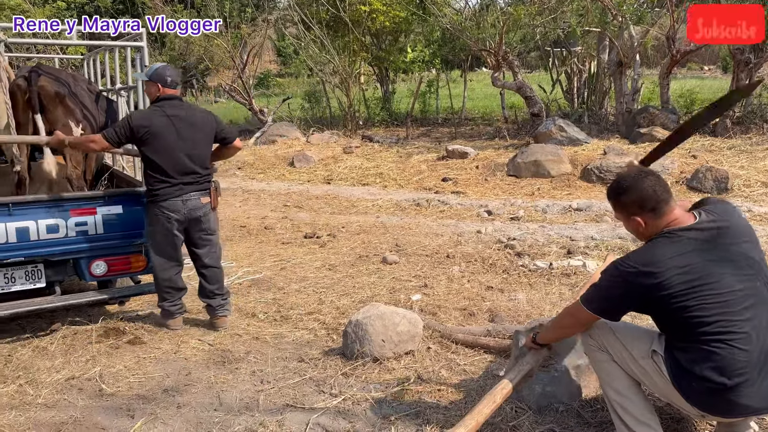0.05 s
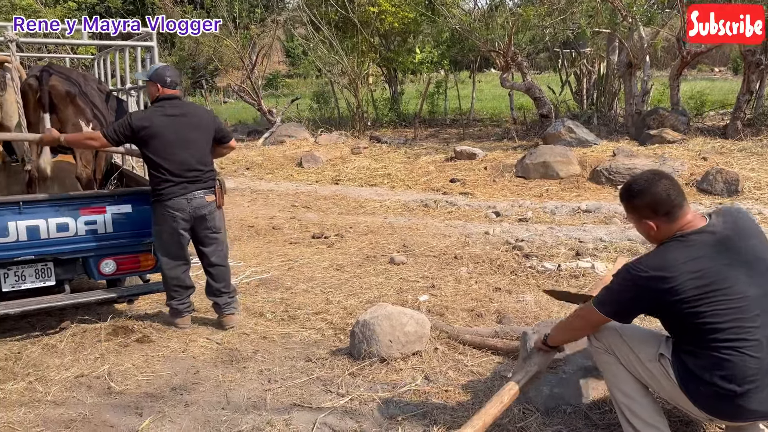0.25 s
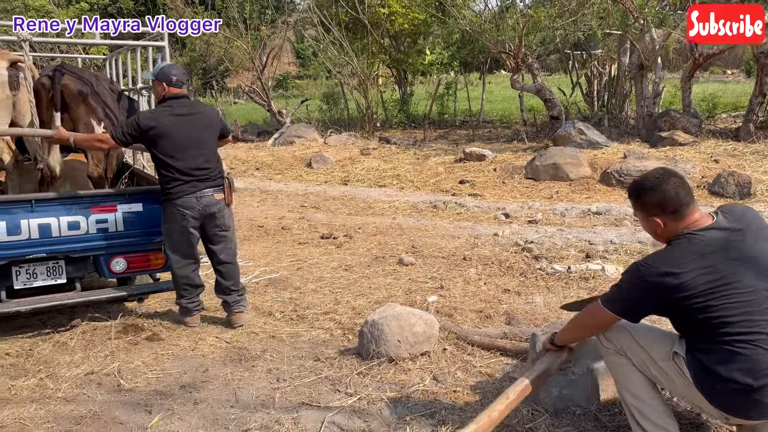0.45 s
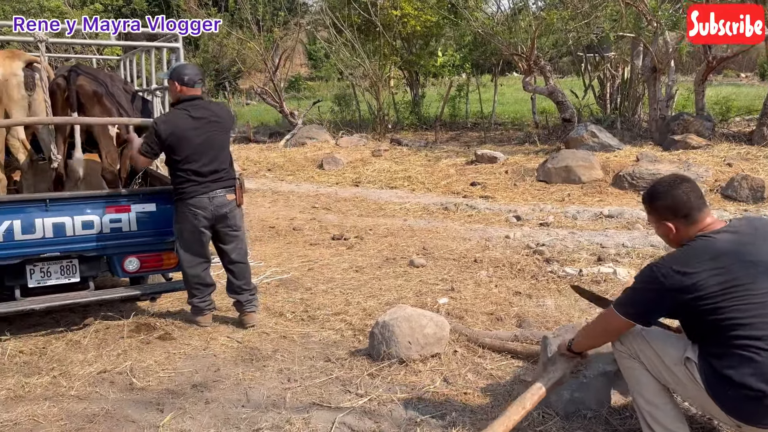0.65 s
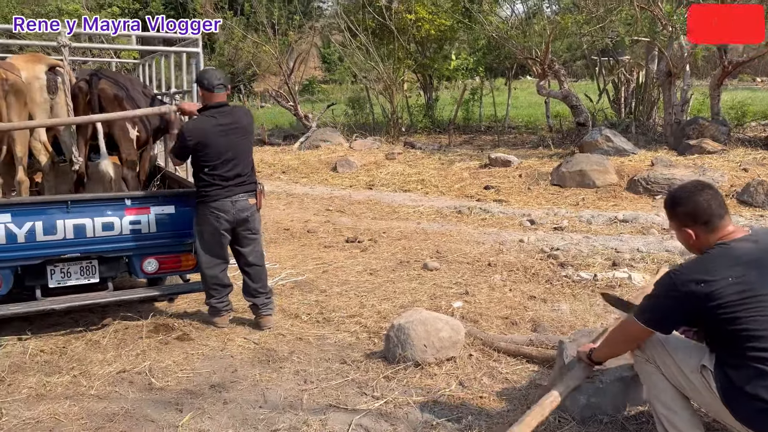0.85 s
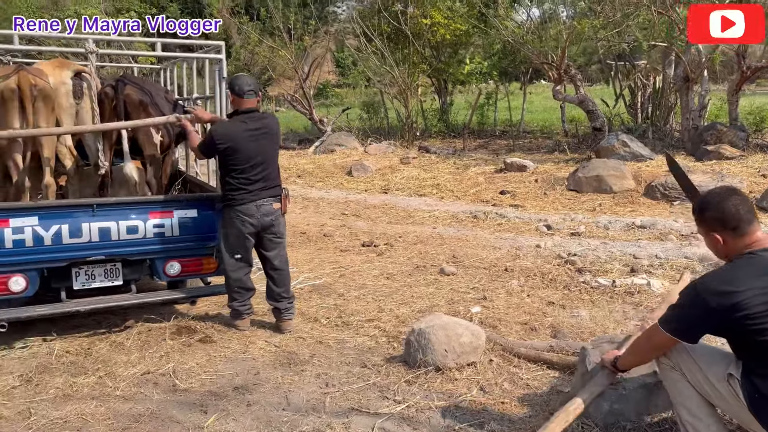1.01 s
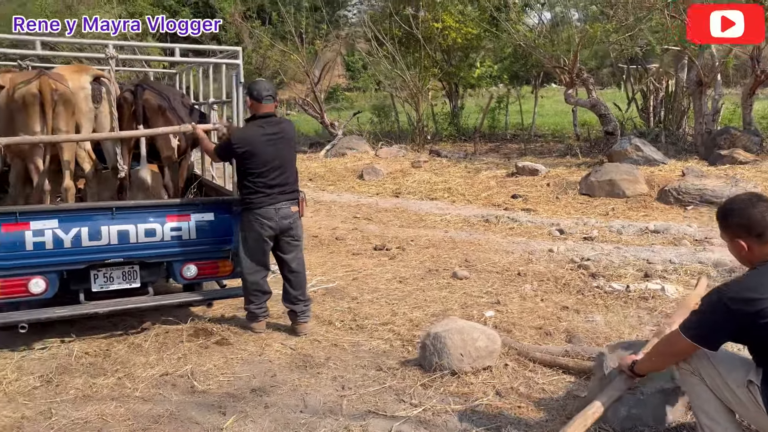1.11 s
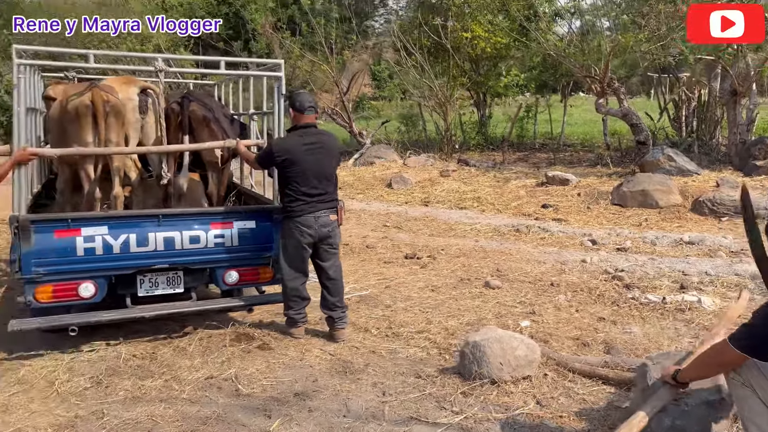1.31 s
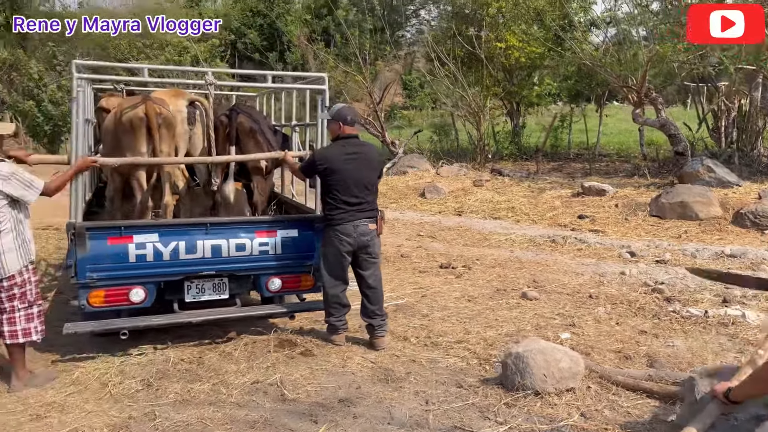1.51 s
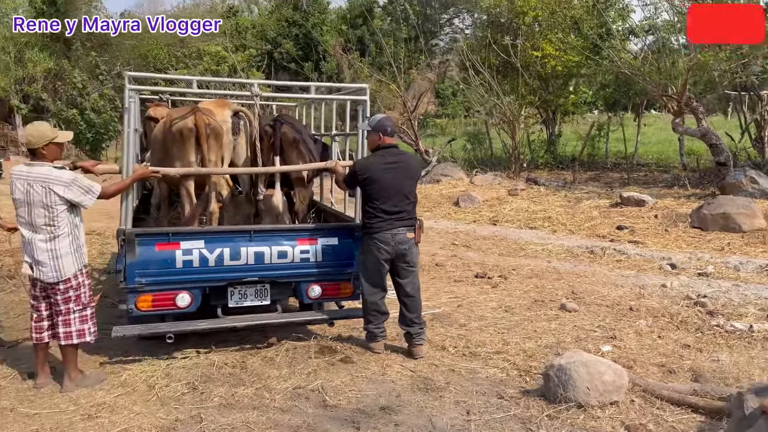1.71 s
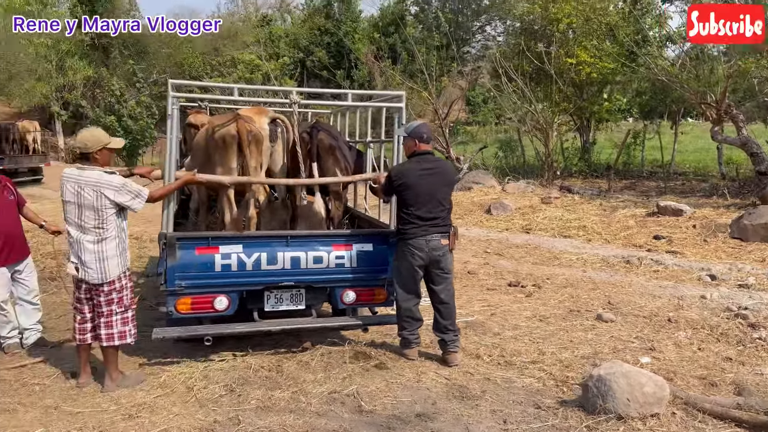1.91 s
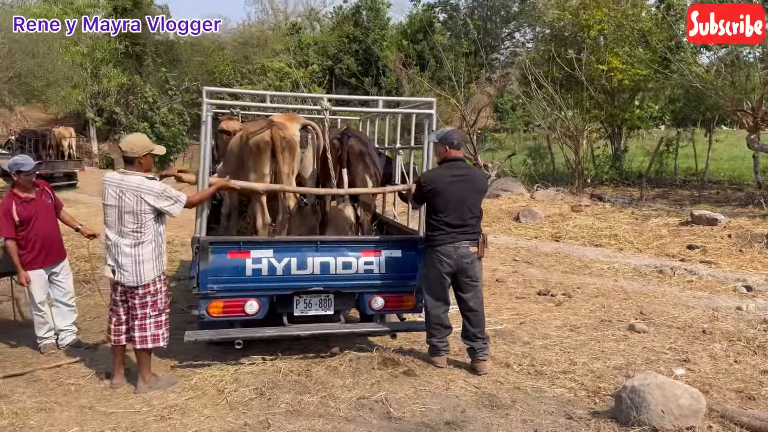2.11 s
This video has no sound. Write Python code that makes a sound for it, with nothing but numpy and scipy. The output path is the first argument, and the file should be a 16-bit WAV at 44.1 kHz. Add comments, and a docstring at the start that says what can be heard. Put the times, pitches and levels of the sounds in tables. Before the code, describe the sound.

Close, dry machete chops into a wooden pole resting on stones, three in all, with splintering crack and short woody ring; steel sings high after the last two. Outdoors in stereo, soft truck bed rumble and hooves behind.

```python
"""Blade steel still sings from an earlier stroke; then a machete chops three times into a wooden pole on stones.
The chops are close, a little right: pushed, knocked and ringing wood as chirps and sines, splinters, thud
and farmyard echo as shaped noise. After the second and third, the blade sings as pitch-bent, fluttering sines.
Behind: cattle hooves boom on a rumbling truck bed, small clinks crackle, a bird chirps once, air hisses."""
import sys
import numpy as np
from scipy import signal
from scipy.fft import rfft, irfft, next_fast_len
from scipy.io import wavfile
from scipy.ndimage import uniform_filter1d, map_coordinates

SR = 44100
rng = np.random.default_rng(int(sys.argv[2]) if len(sys.argv) > 2 else 0)


def unload_wav(signal):
    """Save mono or channel-first audio to the path in sys.argv[1] as 16-bit WAV at rate SR, clipped to [-1, 1]."""
    wavfile.write(
        sys.argv[1],
        SR,
        np.round(np.clip(np.atleast_2d(signal).T, -1, 1) * 32767).astype(np.int16),
    )


N = 94815

# truck bed rumble: spectrum (frequency [Hz], level [dB]); course (time [s], level [dB])
RUMBLE_SPECTRUM = [(20, -34.5), (45, -6.5), (90, 1.5), (160, -2), (300, -7.5), (550, -19.5), (1000, -24),
                   (3000, -51)]
RUMBLE_COURSE = [(0, -69), (.07, -60.5), (0.141, -77), (0.212, -48.5), (.35, -54.5), (.5, -52.5),
                 (.65, -52.5), (.85, -56), (.92, -62.5), (1.0, -57.5), (1.132, -61), (1.2, -45),
                 (1.36, -53), (1.58, -56.5), (1.65, -47.5), (1.8, -56.5), (2.15, -58.5)]
# hooves on the truck bed (time [s], level [dB], resonance [Hz], resonance re bed noise [dB], t60 [s])
HOOVES = [(.365, -58.5, 229.2, -8, 0.52), (0.612, -57.5, 296, 1.5, .45), (0.794, -61, 270.3, 13, 0.13),
          (1.17, -51, 169, -2, .55), (1.61, -65.5, 166, 4.5, 0.36), (2.033, -34.5, 418.7, 0, 0.5)]
# bed noise under a hoof (frequency [Hz], level [dB])
BED_SPECTRUM = [(60, -27.5), (150, -6.5), (300, 0.5), (500, 3), (850, -0.5), (1100, -20), (2000, -21.5),
                (3500, -37), (9000, -56)]
HOOF_RISE_S = 0.003
# knocks, clinks, crackles of gear and dry straw (time [s], level [dB], centre [Hz], width [octaves], t60 [s])
CLICKS = [(.209, -43.5, 6670, 1.1, 0.017), (0.558, -57, 3710, 0.49, 0.26), (.563, -65, 3590, 0.012, 0.57),
          (0.562, -56, 7700, 1.1, 0.16), (.846, -47.5, 900, 0.28, 0.095), (.846, -60, 1100, 0.73, 0.08),
          (0.846, -66.5, 6070, 0.69, 0.17), (0.924, -70, 7040, 0.02, 0.35), (1.166, -64.5, 3570, 0.14, 0.1),
          (1.198, -39, 1960, 0.42, 0.0055), (1.212, -69, 12000, 0.72, 0.036),
          (1.258, -57.5, 3000, 0.73, 0.0066), (2.014, -42, 12000, 1.2, 0.016)]
# steady air noise (frequency [Hz], level [dB])
AIR_SPECTRUM = [(100, -22.5), (900, -3.5), (2000, -4), (7000, -10.5), (10500, -24), (15000, -53)]
AIR_DB = -75

# diffuse sound (frequency [Hz], left-right correlation [-1..1])
CORRELATION = [(100, 0.97), (300, 0.95), (700, 0.47), (1400, 1), (3100, 0.75), (15000, 0.17)]
# left port hears later by
WOOD_LAG_S, BLADE_LAG_S = 0.000088, 0.00019

# blade upper modes (frequency [Hz])
BLADE_HZ = [4110, 4455, 4845, 5280, 5700, 6115, 6545, 7420, 7860]
# the same modes in order (level re upper modes [dB], t60 [s])
BLADE_MODES = [(-5.5, 1.1), (1.5, 0.68), (-15.5, 1.4), (-4, 1.1), (-6.5, 1.3), (-1.5, 1.6), (1, 0.78),
               (0, 0.54), (-17.5, .25)]
BLADE_LOWEST_HZ = 3830
# one list per free swing (time [s], pitch bend [%], lowest mode [dB], upper modes before decay [dB])
SWINGS = [
    [(1.381, -3, -73, -56.5), (1.42, 0.2, -49, -46.5), (1.448, 0, -63, -54), (1.5, 1.5, -47, -51),
     (1.545, 1.2, -43.5, -55.5), (1.615, 2, -59, -51.5), (1.65, -0.4, -57.5, -54.5), (1.79, -1.5, -54, -74),
     (1.85, -3, -58, -85)],
    [(1.851, 0.22, -47.5, -38), (1.89, -0.56, -45.5, -43), (1.945, 0.16, -51.5, -45), (2.0, 0.57, -44, -53),
     (2.03, .8, -45, -53.5), (2.09, -0.17, -64.5, -58), (2.15, -0.71, -66, -58)],
]
# ring left from an earlier stroke (time [s], pitch bend [%], lowest mode [dB], upper modes before decay [dB])
OLD_RING = [(0, -.7, -51, -63), (.07, -1, -94, -55), (.11, -1, -59, -70), (.17, -1, -81.5, -63),
            (.23, -1.6, -66.5, -87)]
OLD_RING_AGE_S = 0.21
MAX_BEND_PERCENT = 2.1  # the largest pitch bend either way
FLUTTER_DB, FLUTTER_KNOTS_PER_S = 3.5, 22
# reflection off the ground; the delay grows as the blade moves
GROUND_GAIN, GROUND_DELAY_S, GROUND_DRIFT_S_PER_S = 0.3, 0.005, 0.006

# chops (time [s], knock [dB], knock [Hz], bite [Hz], bite [dB], bite t60 [s],
#        splinter [dB], crumble [dB], scatter [dB], left minus right [dB])
CHOPS = [(0.2285, 3.5, 742, 2453, -11, 0.019, -20.5, -33.5, -18.5, -1.3),
         (1.3786, 2, 832, 3173, -7.5, 0.01, -25.5, -33.5, -18, -3.5),
         (1.849, 2, 1281, 1845, -12, 0.033, -10.5, -28, -21, -6.5)]
# pole modes (frequency [Hz])
POLE_HZ = [241, 381, 479, 558, 648, 722, 745, 856, 954, 1016, 1151, 1283, 1843, 2123]
# the same modes in order; the spot struck sets the levels
# (t60 before damping cap [s], first chop [dB], second chop [dB], third chop [dB])
POLE_MODES = [(0.17, -26.5, -17, -24.5), (0.15, -41, -21, -19.5), (0.11, -22.5, -23, -23.5),
              (0.2, -27, -17.5, -21.5), (.11, -39, -17.5, -15.5), (0.13, -17, -56, -53),
              (0.17, -28, -11.5, -22), (.115, -28.5, -14, -19), (0.28, -23.5, -40.5, -44),
              (0.27, -14, -38.5, -37.5), (0.15, -23, -14.5, -21.5), (.09, -34, -18.5, -17.5),
              (0.2, -34, -31, -32), (0.21, -33, -45.5, -61.5)]
POLE_RISE_S = 0.0027
POLE_T60_CAP_700HZ_S = 0.145  # hand and stones damp the pole, high modes more
KNOCK_RISE_S, KNOCK_T60_S = 0.003, 0.022
# first push of the edge (frequency [Hz], gain [dB])
PUSH_SPECTRUM = [(60, -34.5), (200, -37.5), (450, -14), (900, 13), (1500, 11), (2300, -5.5), (4000, -36.5),
                 (9000, -28.5)]
PUSH_RE_KNOCK_DB = 9.5
BENDING_TRAVEL_1KHZ_S = 0.001327
# splitting fibres (frequency [Hz], level [dB])
SPLINTER_SPECTRUM = [(500, -15.5), (2500, -11.5), (3500, -7), (4600, -1.5), (6200, -5.5), (8200, -1),
                     (9500, -6.5), (11000, -30.5), (13000, -1.5), (16000, -10)]
SPLINTER_DELAY_S, SPLINTER_T60_S, CRUMBLE_T60_S = 0.0019, 0.012, 0.17
# scatter off ground and stones (frequency [Hz], level [dB])
SCATTER_SPECTRUM = [(50, -29), (120, -19.5), (200, -5), (400, -4), (800, 0.5), (1200, -11.5), (1600, -16),
                    (2500, -20), (3500, -29), (9000, -64.5)]
SCATTER_RISE_S, SCATTER_T60_S = 0.004, 0.16
REFLECTION_DB, REFLECTION_DELAY_S = -20.5, 0.017  # off a nearby surface
# thud of the ground under the pole (frequency [Hz], level [dB])
THUD_SPECTRUM = [(20, -34), (50, -24.5), (85, 0), (140, -10), (250, -19.5), (600, -65.5)]
THUD_DB, THUD_DELAY_S, THUD_T60_S = -33.5, 0.014, 0.27
# far yard echo (frequency [Hz], level [dB])
YARD_SPECTRUM = [(60, -6.5), (140, -33.5), (400, -6.5), (1000, -0.5), (2500, -8.5), (7000, -7.5),
                 (10000, -18.5), (15000, -33.5)]
YARD_DB, YARD_RISE_S, YARD_T60_S = -55, 0.0094, 0.88
PAN_FROM_HZ = 420  # lower sound reaches both ports equally
TOP_HZ = 16500


def amp(db):
    """Decibels to gain."""
    return 10 ** (np.asarray(db) / 20)


def unit(x):
    """Scaled to rms 1."""
    return x / np.sqrt(np.mean(x ** 2) + 1e-20)


def along(points, hz):
    """Interpolate (Hz, value) points on a log-frequency axis."""
    point_hz, values = np.transpose(points)
    return np.interp(np.log(hz + 1), np.log(point_hz + 1), values)


def since(start_s):
    """Seconds after start_s, zero before."""
    return np.maximum(np.arange(N) / SR - start_s, 0)


def decay(t, t60_s):
    """Exponential decay, 60 dB in t60_s."""
    return np.exp(-np.log(1000) * t / t60_s)


def fade(start_s, rise_s, t60_s):
    """Quick exponential rise, then exponential decay."""
    t = since(start_s)
    return (1 - np.exp(-t / rise_s)) * decay(t, t60_s)


def tone(start_s, hz):
    """A sine that starts at start_s in zero phase."""
    return np.sin(2 * np.pi * hz * since(start_s))


def wobble(knots_per_s):
    """A smooth random curve through knots of unit variance."""
    knots = rng.standard_normal(size=200)
    return map_coordinates(knots, [np.arange(N) * knots_per_s / SR], mode="wrap")


def filtered(x, response):
    """x times a complex response of frequency, zero-padded."""
    m = next_fast_len(N + SR // 2)
    return irfft(rfft(x, m) * response(np.fft.rfftfreq(m, 1 / SR)), m)[..., :N]


def noise(colour_db):
    """Diffuse stereo noise of rms 1; mid and side shares set the correlation at each frequency."""
    def mid_side_gain(f):
        angle = np.arccos(np.clip(along(CORRELATION, f), -1, 1)) / 2
        return amp(colour_db(f)) * [np.cos(angle), np.sin(angle)]

    mid, side = filtered(rng.standard_normal((2, N)), mid_side_gain)
    return unit(np.array([mid + side, mid - side]))


def rush(spectrum):
    """Diffuse noise of rms 1 with an (Hz, dB) spectrum."""
    return noise(lambda f: along(spectrum, f))


def placed(x, lag_s):
    """A mono sound at the two ports, the left one later."""
    return filtered(x, lambda f: np.exp(-1j * np.pi * f * lag_s * np.array([[1], [-1]])))


def air():
    """Steady broadband hiss."""
    return amp(AIR_DB) * rush(AIR_SPECTRUM)


def cattle():
    """Hooves excite bed noise and one resonance each, over the bed's low rumble."""
    time_s, level_db = np.transpose(RUMBLE_COURSE)
    out = rush(RUMBLE_SPECTRUM) * amp(np.interp(np.arange(N) / SR, time_s, level_db))
    for start_s, db, hz, share_db, t60_s in HOOVES:
        boom = rush(BED_SPECTRUM) + amp(share_db) * tone(start_s, hz)
        out = out + amp(db) * fade(start_s, HOOF_RISE_S, t60_s) * boom
    return out


def clicks():
    """Faint clinks and crackles: decaying noise bands, bell-shaped in octaves."""
    out = np.zeros((2, N))
    for start_s, db, hz, width, t60_s in CLICKS:
        band = noise(lambda f: -np.minimum(4 * (np.log2((f + 1) / hz) / width) ** 2, 60))
        out += amp(db) * fade(start_s, t60_s / 50, t60_s) * band
    return out


def bird(start_s=1.275, length_s=0.018, from_hz=6500, to_hz=4900, db=-68):
    """One far chirp: a sine gliding down under a half-sine envelope."""
    u = np.clip(since(start_s) / length_s, 0, 1)
    hz = from_hz + (to_hz - from_hz) * u
    return amp(db) * np.sin(np.pi * u) * np.sin(2 * np.pi * np.cumsum(hz) / SR)


def blade(swing, age_s=0):
    """Steel modes sing; the swing bends pitch, upper modes flutter, the ground reflection beats."""
    time_s, bend_percent, low_db, upper_db = np.transpose(swing)
    now, t = np.arange(N) / SR, since(time_s[0])
    bend = np.clip(np.interp(now, time_s, bend_percent), -MAX_BEND_PERCENT, MAX_BEND_PERCENT)
    bent_time = np.cumsum(1 + bend / 100) / SR

    def sing(hz):
        return np.sin(2 * np.pi * (hz * bent_time + rng.random()))

    upper = np.zeros(N)
    for hz, (db, t60_s) in zip(BLADE_HZ, BLADE_MODES):
        flutter_db = FLUTTER_DB * wobble(FLUTTER_KNOTS_PER_S)
        upper += amp(db + flutter_db) * decay(t + age_s, t60_s) * sing(hz)
    ring = amp(np.interp(now, time_s, low_db)) * sing(BLADE_LOWEST_HZ)
    ring = ring + amp(np.interp(now, time_s, upper_db)) * upper
    gate = np.clip(np.minimum(t, time_s[-1] - now) / 0.0044, 0, 1)  # 4.4 ms ramps
    direct = ring * gate
    ground_delay_s = GROUND_DELAY_S + GROUND_DRIFT_S_PER_S * (t + 0.008 * wobble(11))
    ground = GROUND_GAIN * np.interp(now - ground_delay_s, now, direct)
    return placed(direct, BLADE_LAG_S) + ground


def push(start_s):
    """The edge's push, a falling chirp because low bending waves travel slowly."""
    def response(f):
        phase = 2 * np.pi * (f * start_s + 2 * BENDING_TRAVEL_1KHZ_S * np.sqrt(f * 1000))
        return amp(along(PUSH_SPECTRUM, f)) * np.exp(-1j * phase)

    return filtered(signal.unit_impulse(N), response) * (since(start_s) > 0)


def pole(start_s, chop):
    """Pole modes after one blow: damped sines of alternating sign."""
    out = np.zeros(N)
    for k, (hz, (t60_s, *levels_db)) in enumerate(zip(POLE_HZ, POLE_MODES)):
        damped_t60_s = min(t60_s, POLE_T60_CAP_700HZ_S * (700 / hz) ** 0.5)
        mode = tone(start_s, hz) * fade(start_s, POLE_RISE_S, damped_t60_s)
        out += amp(levels_db[chop]) * (-1) ** k * mode
    return out


def wood(start_s, chop, knock_db, knock_hz, bite_hz, bite_db, bite_t60_s):
    """Pushed and knocked by the edge, bitten, then ringing."""
    knock = tone(start_s, knock_hz) * fade(start_s, KNOCK_RISE_S, KNOCK_T60_S)
    knock = amp(knock_db) * (amp(PUSH_RE_KNOCK_DB) * push(start_s) + knock)
    bite = amp(bite_db) * tone(start_s, bite_hz) * fade(start_s, 0.00034, bite_t60_s)
    return placed(knock + bite + pole(start_s, chop), WOOD_LAG_S)


def scatter(start_s, db):
    """Diffuse return off ground and stones, plus a delayed one off a nearby surface."""
    near = amp(db) * fade(start_s, SCATTER_RISE_S, SCATTER_T60_S)
    reflected = amp(REFLECTION_DB) * fade(start_s + REFLECTION_DELAY_S, 0.004, 0.046)
    return rush(SCATTER_SPECTRUM) * (near + reflected)


def fibres(start_s, splinter_db, crumble_db):
    """Fibres split in a short noise burst, then crumble with a grainy level."""
    grain_db = 2 * unit(uniform_filter1d(rng.standard_normal(N), size=50))
    splinter = amp(splinter_db) * fade(start_s + SPLINTER_DELAY_S, 0.0009, SPLINTER_T60_S)
    crumble = amp(crumble_db) * unit(amp(grain_db)) * fade(start_s, 0.002, CRUMBLE_T60_S)
    return rush(SPLINTER_SPECTRUM) * (splinter + crumble)


def thud(start_s):
    """The ground under the pole answers with low noise."""
    return amp(THUD_DB) * rush(THUD_SPECTRUM) * fade(start_s + THUD_DELAY_S, 0.0054, THUD_T60_S)


def yard_echo(start_s):
    """The yard answers with long diffuse noise."""
    return amp(YARD_DB) * rush(YARD_SPECTRUM) * fade(start_s, YARD_RISE_S, YARD_T60_S)


def panned(x, pan_db):
    """Left-right level difference that grows with frequency."""
    sides_db = np.array([[pan_db], [-pan_db]]) / 2
    return filtered(x, lambda f: amp(sides_db * f ** 2 / (f ** 2 + PAN_FROM_HZ ** 2)))


def chops():
    """Each blow sums panned wood and scatter with splitting fibres, ground thud and yard echo."""
    out = np.zeros((2, N))
    for chop, (start_s, *blow, splinter_db, crumble_db, scatter_db, pan_db) in enumerate(CHOPS):
        near = wood(start_s, chop, *blow) + scatter(start_s, scatter_db)
        out += panned(near, pan_db) + fibres(start_s, splinter_db, crumble_db)
        out += thud(start_s) + yard_echo(start_s)
    return out


def scene():
    """The chopping in front of the quiet farmyard."""
    yard = air() + cattle() + clicks() + bird()
    steel = blade(OLD_RING, OLD_RING_AGE_S) + sum(blade(swing) for swing in SWINGS)
    return yard + steel + chops()


def record(dry):
    """Round off the highest peaks, then cut everything from TOP_HZ up."""
    rounded = dry / (1 + np.abs(dry) ** 6) ** (1 / 6)
    return filtered(rounded, lambda f: f < TOP_HZ)


dry = scene()
out = record(dry)
unload_wav(out)
```